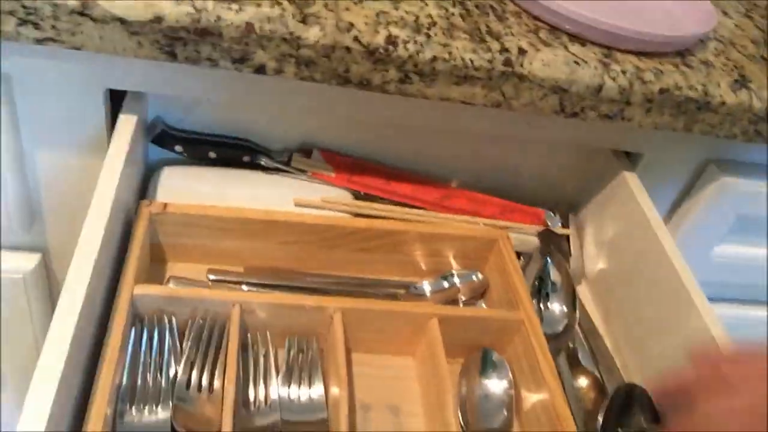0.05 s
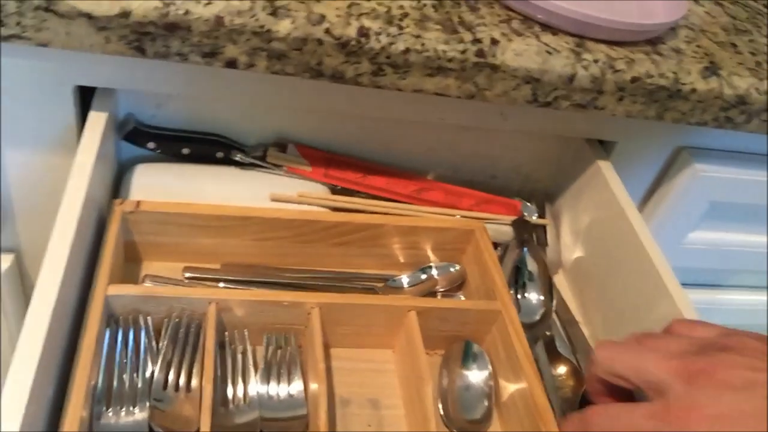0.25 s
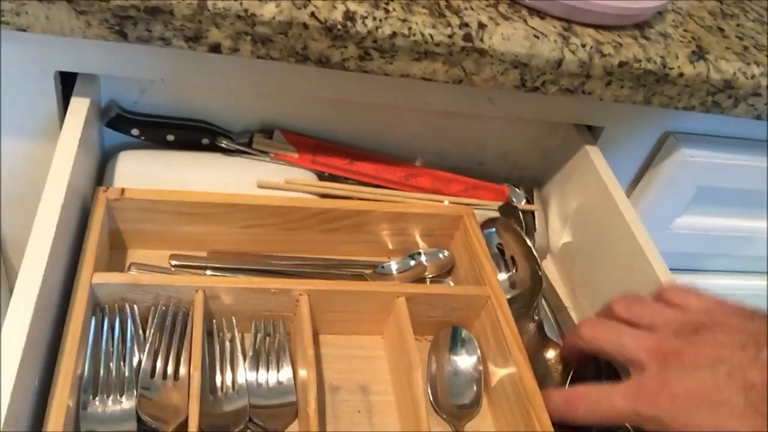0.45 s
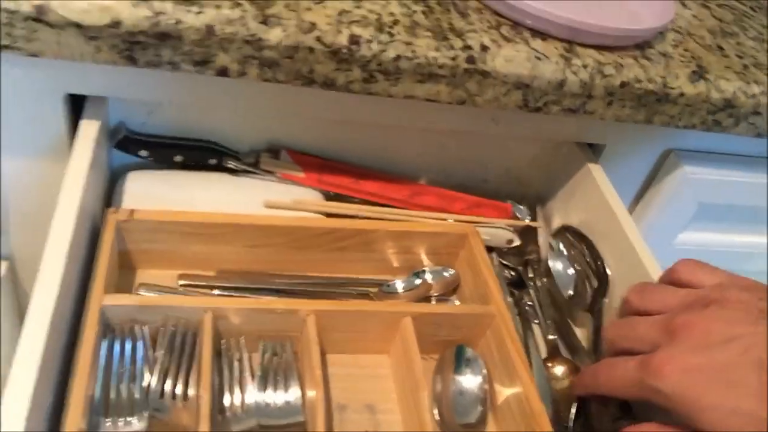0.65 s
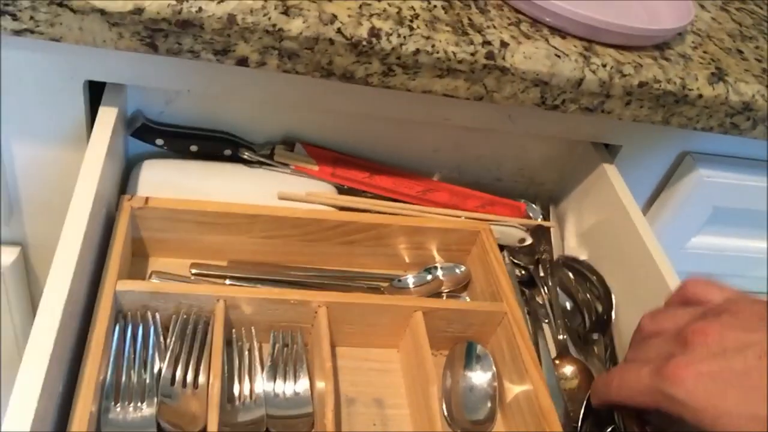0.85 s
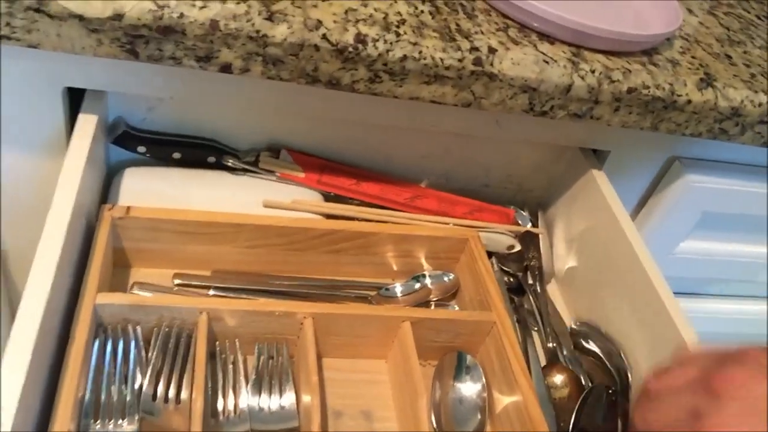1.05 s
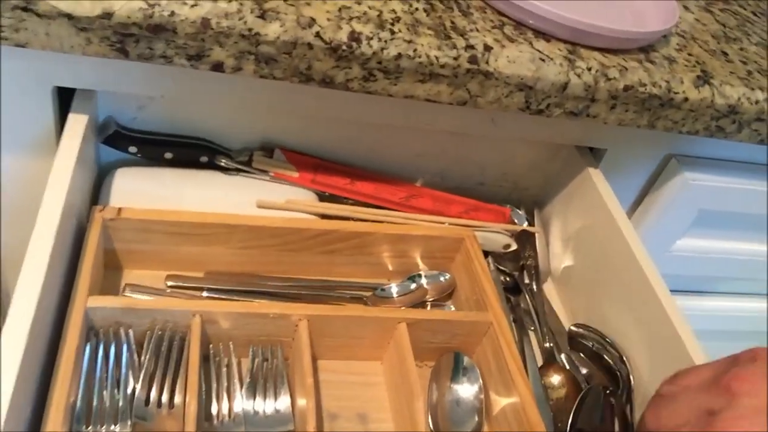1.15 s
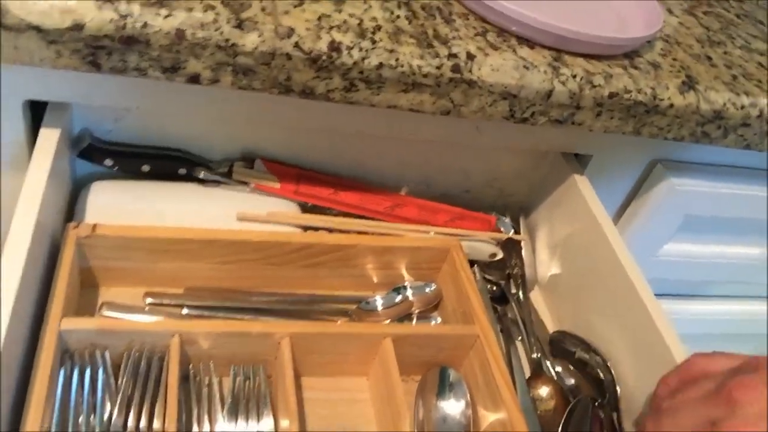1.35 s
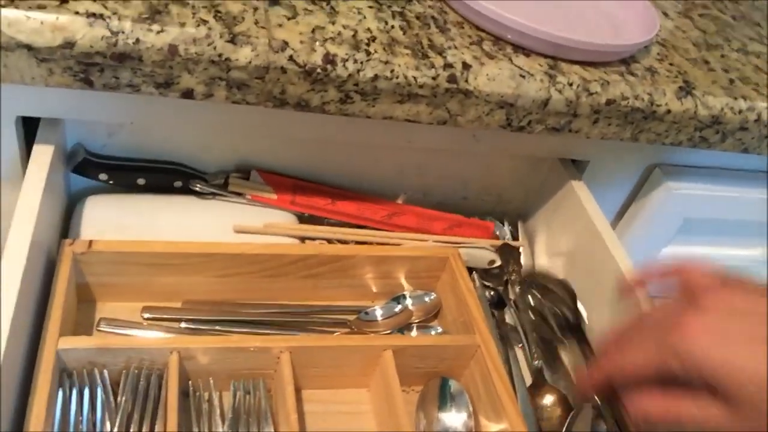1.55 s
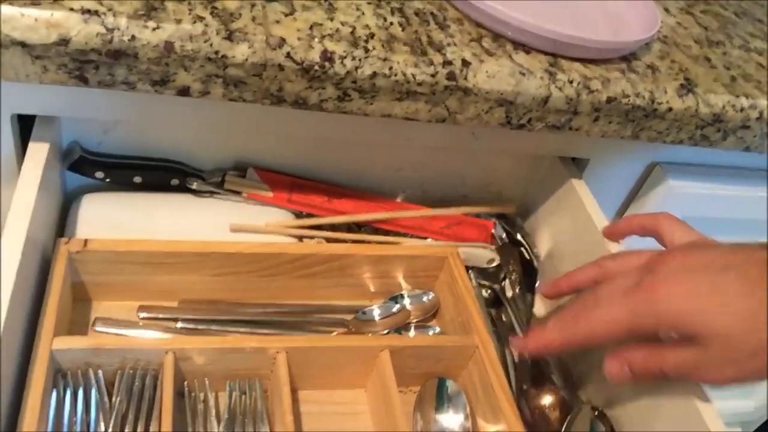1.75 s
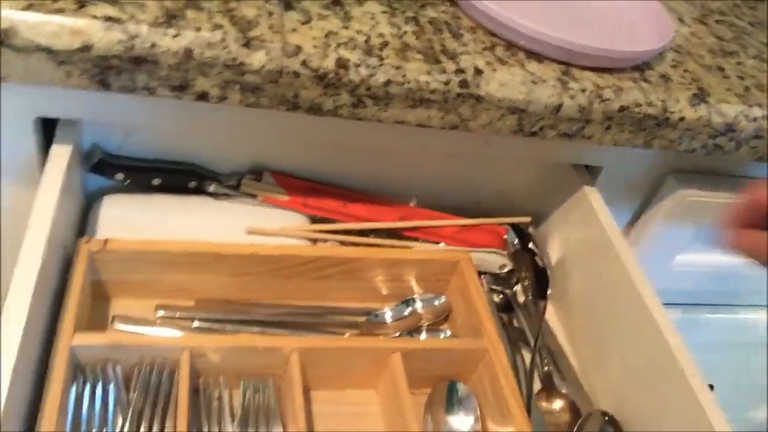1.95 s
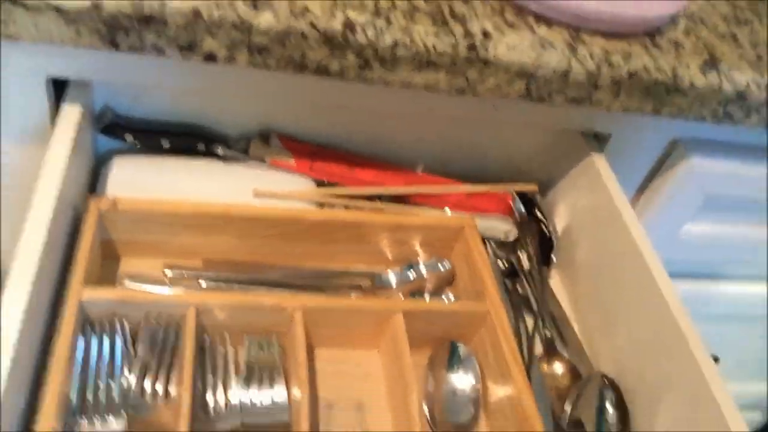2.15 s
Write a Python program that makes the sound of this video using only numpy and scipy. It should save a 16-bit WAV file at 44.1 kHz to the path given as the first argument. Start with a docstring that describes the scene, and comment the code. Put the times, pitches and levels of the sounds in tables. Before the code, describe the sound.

Metal spoons clatter and jingle as a hand rummages through a wooden kitchen drawer, close up

```python
"""In the side of an open wooden kitchen drawer, close to the microphone, a hand rummages through loose steel spoons.
Each contact excites the heap's crowded modes, the few modes of one piece and the resonances of the drawer.
Slides are trains of small contacts; a heavy ladle blow, singing scrapes and a freely ringing spoon stand out.
A small kitchen answers diffusely over a quiet background, and the hardest blow overloads the recorder."""
import sys
import numpy as np
from scipy import signal
from scipy.fft import rfft, irfft, next_fast_len
from scipy.io import wavfile

SR = 44100
rng = np.random.default_rng(int(sys.argv[2]) if len(sys.argv) > 2 else 0)


def write(x):
    x = np.atleast_2d(x).T
    wavfile.write(sys.argv[1], SR, np.round(np.clip(x, -1, 1) * 32767).astype(np.int16))


N = 97020  # length [samples]
T = np.arange(int(.4 * SR)) / SR  # time axis of one contact [s]
ATTACK_S = 0.00049  # time constant of every onset
TOP_HZ = 15750  # band limit


def amp(db):
    """Level: decibels to an amplitude ratio."""
    return 10 ** (np.asarray(db) / 20)


def unit(x):
    """Normalisation: equal mean power, rms 1 along the last axis."""
    return x / np.sqrt(np.mean(x ** 2, axis=-1, keepdims=True) + 1e-20)


def along(points, hz):
    """Logarithmic frequency scale: read (Hz, value) points between their frequencies."""
    f, v = np.transpose(points)
    return np.interp(np.log(hz + 1), np.log(f + 1), v)


def fade(t60, t=T):
    """Exponential decay: 60 dB are lost in each t60, one row per value."""
    exponent = -np.log(1000) * t / np.reshape(t60, (-1, 1))
    return np.exp(np.float32(np.maximum(exponent, -30)))


def onset():
    """Finite contact time: the amplitude approaches its full value exponentially."""
    return 1 - np.exp(-T / ATTACK_S)


def noise(colour, count, size):
    """Spectral shaping: rows of noise of rms 1 weighted by a colour curve."""
    gain = amp(along(colour, np.fft.rfftfreq(size, 1 / SR)))
    spectra = rfft(rng.standard_normal((count, size)))
    return unit(irfft(spectra * gain, size))


def modes(hz, gains, t60):
    """Modal superposition: damped sines, one row of gains per contact, scaled to a starting rms of 1."""
    waves = np.sin(np.float32(2 * np.pi * np.outer(hz, T))) * fade(t60)
    start_rms = np.sqrt(np.sum(gains ** 2, axis=1, keepdims=True) / 2)
    return np.float32(gains / start_rms) @ waves


RING_SCATTER_DB = 1.5


def struck(db, count):
    """Modal participation: the size and sign of each mode change with the spot struck."""
    z = rng.standard_normal((count, 2, len(db)))
    return amp(db + RING_SCATTER_DB * z[:, 0]) * np.sign(z[:, 1])


# Single contacts, with relative levels of their parts: (time [s], treble chink level [dB],
# midrange clack level [dB], drawer knock level [dB], t60 that damps the heap and the thud [s],
# ring level [dB], strongest ring frequency [Hz], piece)
CONTACTS = [ (0.000, -24.5, -20.5, -33, 0.15, -29.5, 6944, "teaspoon"),
            (0.034, -33, -26.5, -34, 0.047, -36, 1232, "teaspoon"),
            (0.104, -42, -37, -50, 0.023, -42, 1660, "teaspoon"),
            (0.159, -23.5, -25.5, -27.5, 0.12, -28.5, 7270, "teaspoon"),
            (0.189, -29, -27.5, -33, 0.14, -31, 1196, "teaspoon"),
            (0.218, -16, -18, -30, 0.037, -20.5, 7760, "teaspoon"),
            (0.274, -18, -22.5, -31, 0.086, -27, 6950, "teaspoon"),
            (0.302, -12, -12, -28, 0.078, -18, 2520, "teaspoon"),
            (0.316, -11, -10.5, -27, 0.072, -16, 1210, "teaspoon"),
            (0.336, -15.5, -25, -33.5, 0.15, -22, 7960, "teaspoon"),
            (0.385, -12, -12, -20.5, 0.035, -23, 5310, "teaspoon"),
            (0.440, -26.5, -27.5, -36, 0.1, -39, 8740, "teaspoon"),
            (0.468, -29, -28, -30, 0.077, -35.5, 1204, "teaspoon"),
            (0.586, -18, -20.5, -21, 0.14, -23.5, 11380, "teaspoon"),
            (0.614, -12, -12, -14, 0.095, -18.5, 11670, "teaspoon"),
            (0.628, -8.5, -18.5, -20, 0.13, -23, 1167, "teaspoon"),
            (0.677, -12.5, -9, -34, 0.027, -35, 2340, "ladle"),
            (0.684, -10, 0.5, -8.5, 0.029, -9.5, 2360, "ladle"),
            (0.689, -3.5, -20, -23, 0.055, -14.5, 7430, "ladle"),
            (0.711, -18, -20.5, -27.5, 0.19, -26, 840, "teaspoon"),
            (0.727, -16.5, -15.5, -23, 0.1, -30, 6966, "teaspoon"),
            (0.929, -13.5, -15, -23, 0.071, -23, 2080, "ladle"),
            (0.947, -31, -21, -28.5, 0.038, -23.5, 2000, "ladle"),
            (1.027, -42, -36, -47, 0.11, -39, 3832, "teaspoon"),
            (1.079, -24.5, -24, -30.5, 0.58, -42, 2100, "teaspoon"),
            (1.113, -16, -14, -25.5, 0.25, -26, 972, "teaspoon"),
            (1.126, -13, -14.5, -24, 0.11, -18, 985, "teaspoon"),
            (1.140, -27, -19, -22, 0.08, -19.5, 3900, "teaspoon"),
            (1.164, -18, -17, -24, 0.078, -30, 2004, "teaspoon"),
            (1.202, -16.5, -25.5, -35, 0.2, -21, 12200, "teaspoon"),
            (1.238, -39, -37, -55, 0.11, -28, 3700, "teaspoon"),
            (1.297, -26, -26.5, -30, 0.036, -31.5, 1154, "teaspoon"),
            (1.347, -23.5, -36, -66, 0.078, -39.5, 7020, "teaspoon"),
            (1.356, -34, -26.5, -40.5, 0.11, -35.5, 2000, "ladle"),
            (1.555, -37.5, -36, -38, 0.075, -44, 4330, "spoon"),
            (1.596, -17, -13, -15, 0.052, -19.5, 1290, "spoon"),
            (1.610, -28, -28.5, -33.5, 0.04, -33, 1235, "spoon"),
            (1.630, -14, -32, -40, 0.035, -13.5, 5960, "spoon"),
            (1.632, -10.5, -18, -24, 0.07, -13.5, 12410, "spoon"),
            (1.653, -16.5, -15.5, -22, 0.11, -22.5, 1813, "spoon"),
            (1.679, -19.5, -17, -40, 0.06, -27, 2716, "spoon"),
            (1.688, -22, -48, -23.5, 0.05, -32, 1266, "spoon"),
            (1.702, -15.5, -18.5, -38, 0.062, -21, 1178, "spoon"),
            (1.710, -24, -18.5, -28, 0.057, -30, 1260, "spoon"),
            (1.752, -16.5, -33, -47, 0.042, -24.5, 6130, "spoon"),
            (1.756, -22.5, -17.5, -27, 0.038, -23, 11770, "spoon"),
            (1.815, -19, -22, -26.5, 0.13, -24, 11627, "spoon"),
            (1.830, -33, -16.5, -33, 0.13, -22.5, 1413, "spoon"),
            (1.841, -18, -35, -30.5, 0.18, -37, 11640, "spoon"),
            (1.874, -9.5, -10, -23.5, 0.055, -14.5, 9570, "spoon"),
            (1.894, -16.5, -15, -30, 0.054, -18, 9528, "spoon"),
            (1.917, -19, -21.5, -27, 0.067, -30.5, 3703, "spoon"), ]
# Pieces sliding over each other, with relative levels for each small contact: (start time [s],
# end time [s], chink level [dB], clack level [dB], knock level [dB], ring level [dB], piece)
SLIDING = [ (0.196, 0.248, -26, -27.5, -31.5, -31, "teaspoon"),
           (0.492, 0.580, -53, -43, -48, -72, "teaspoon"), (0.593, 0.662, -15, -17, -27.5, -27, "teaspoon"),
           (0.739, 0.925, -48, -35, -45, -49.5, "teaspoon"),
           (0.956, 1.110, -42.5, -35.5, -43, -42.5, "ladle"),
           (1.126, 1.178, -16.5, -23, -37, -31, "teaspoon"),
           (1.178, 1.245, -25, -28.5, -41, -36, "teaspoon"),
           (1.301, 1.388, -36.5, -35.5, -48, -53, "teaspoon"),
           (1.501, 1.556, -54, -41.5, -51, -52, "spoon"), (1.601, 1.707, -30, -24.5, -34, -52.5, "spoon"),
           (1.770, 1.870, -35, -33, -50, -56, "spoon"), ]
SLIDE_PER_S, SLIDE_T60_S, SLIDE_SCATTER_DB = 100, 0.093, 1.5
SLIDE_RING_HZ, SLIDE_RING_OCTAVES = 4740, 0.57  # centre and spread of the strongest ring


def contacts():
    """Sliding as repeated impact: the single hits, then a train of small contacts for each slide."""
    rows = list(CONTACTS)
    for start, end, chink, clack, knock, ring, piece in SLIDING:
        for s in np.arange(start, end, 1 / SLIDE_PER_S):
            d = SLIDE_SCATTER_DB * rng.standard_normal()
            lead_hz = SLIDE_RING_HZ * 2 ** (SLIDE_RING_OCTAVES * rng.standard_normal())
            lead_hz = min(lead_hz, TOP_HZ)
            time = s + rng.random() / SLIDE_PER_S
            rows.append((time, chink + d, clack + d, knock + d, SLIDE_T60_S, ring + d, lead_hz, piece))
    return rows


COLOUR_DB, COLOUR_STEP_HZ = 4.5, 323.8  # each contact favours its own regions of the spectrum
PILE_T60_S = 1  # decay of the modes before the contact's own damping is multiplied in
CRACK_DB, CRACK_T60_S = 2, 0.05  # crack relative to the modes


def pile(colour, t60, lo_hz, hi_hz, count):
    """High modal density: a crack and the heap's crowded modes, coloured anew and damped by other pieces."""
    hz = lo_hz + (hi_hz - lo_hz) * (np.arange(count) + rng.random(count)) / count
    knots = rng.standard_normal((len(t60), 128))
    bumps = np.array([np.interp(hz / COLOUR_STEP_HZ, np.arange(len(k)), k) for k in knots])
    gains = amp(along(colour, hz) + COLOUR_DB * bumps) * rng.standard_normal((len(t60), count))
    heap = modes(hz, gains, PILE_T60_S) * fade(t60)
    crack = amp(CRACK_DB) * noise(colour, len(t60), len(T)) * fade(CRACK_T60_S)
    return (heap + crack) / np.sqrt(2)


# Modes of the single steel pieces, by piece: (frequency [Hz], relative level [dB])
PIECE_MODES = { "teaspoon": [(1227, 1), (2444, -1), (4269, 0), (6780, -10.5), (6966, 3.5), (7740, -1),
               (8371, -17.5), (11886, 0.5), (12209, -1), (13087, -9), (14174, -0.5), (15493, -3)],
               "ladle": [(1245, -5), (1605, -5), (2012, 10), (2272, 2), (3130, 5), (6966, -1), (7423, -1),
               (8790, 0.5), (9880, 1.5), (11012, -9)], "spoon": [(1190, -8), (1262, -1), (2320, -9),
               (3682, -3), (5075, -7.5), (5954, -15), (7553, -1.5), (7858, 3), (8769, -1.5), (9528, -6),
               (11030, -2), (11630, 1), (12420, -7)], }
# Central decay time of each piece's modes, by piece: t60 [s]
PIECE_T60_S = {"teaspoon": 0.13, "ladle": 0.097, "spoon": 0.12}
RING_DB = -0.5  # all modes of the piece
LEAD_DB, LEAD_T60_S = 3.5, 0.081  # the mode excited most, and its longest decay
DETUNE, DAMPING_SPREAD = 0.00412, 0.076  # grip of the neighbours: spread of pitch (ratio) and log decay
TEASPOON_SPREAD = 0.03  # no two teaspoons have quite the same pitch (ratio)


def rings(pieces, lead_hz, clatter_t60):
    """Sparse modes: the struck piece rings above the heap, led by one mode and altered by how it is held."""
    out = []
    for name, lead, t60 in zip(pieces, lead_hz, clatter_t60):
        hz, db = np.transpose(PIECE_MODES[name])
        shift, damping = rng.standard_normal((2, len(hz)))
        own_pitch = 1 + TEASPOON_SPREAD * rng.standard_normal() * (name == "teaspoon")
        held_hz = hz * own_pitch * (1 + DETUNE * shift)
        held_t60 = PIECE_T60_S[name] * np.exp(DAMPING_SPREAD * damping)
        body = modes(held_hz, struck(db, 1), held_t60)
        strongest = modes([lead], np.ones((1, 1)), min(LEAD_T60_S, t60))
        out.append(amp(RING_DB) * body + amp(LEAD_DB) * strongest)
    return np.vstack(out)


# Resonances of the wooden drawer: (frequency [Hz], relative level [dB], t60 [s])
WOOD = [(172, -3, 0.151), (213.3, -2, 0.1), (296.3, -3.5, 0.13), (351.7, 3, 0.13), (424.2, 0, 0.086),
        (521.5, 6, 0.076), (576.6, 0, 0.072)]
# Colour of the dull thud: (frequency [Hz], relative level per Hz [dB])
THUD_COLOUR = [(25, -39), (60, -20), (115, -17), (165, -0.5), (250, 2.5), (350, 2), (500, -2.5),
               (650, -5.5), (1100, -5), (3000, -37.5)]
DRAWER_DB, THUD_DB = -5, -4.5  # resonances and thud within a knock


def drawer(t60):
    """Forced panel vibration: a dull thud and the resonances of the drawer's bottom."""
    hz, db, wood_t60 = np.transpose(WOOD)
    wood = modes(hz, struck(db, len(t60)), wood_t60)
    thud = noise(THUD_COLOUR, len(t60), len(T)) * fade(t60)
    return amp(DRAWER_DB) * wood + amp(THUD_DB) * thud


WALLS_S, WALLS_DB = .012, -3  # longest delay; summed level of the reflections relative to the direct sound


def walls(sound, count=8):
    """Early reflection: quick echoes from drawer sides and counter, different for each spot in the heap."""
    out = sound.copy()
    gain = amp(WALLS_DB) / np.sqrt(count)
    delays = rng.uniform(.1, 1, count) * WALLS_S
    for delay, sign in zip(delays, rng.choice([-1, 1], count)):
        out += sign * gain * np.pad(sound, (int(delay * SR), 0))[:len(sound)]
    return unit(out) * np.std(sound)  # the overall level stays that of the contact


# Colour of the treble chink: (frequency [Hz], relative level per Hz [dB])
CHINK_COLOUR = [(2000, -16.5), (3500, 0.5), (4500, -2), (6000, -1), (8000, -2), (10300, -4), (12000, -2.5),
                (14000, -5), (15700, -10.5)]
# Colour of the midrange clack: (frequency [Hz], relative level per Hz [dB])
CLACK_COLOUR = [(400, -12.5), (720, -6), (1000, -3.5), (1250, 3), (1600, -2), (2200, 1), (3000, -4.5),
                (4000, -6), (6000, -30)]


def cutlery():
    """Impact excitation: every contact chinks, clacks, rings a piece and knocks the drawer."""
    times, chink, clack, knock, t60, ring, lead_hz, pieces = map(np.array, zip(*contacts()))
    sounds = amp(chink)[:, None] * pile(CHINK_COLOUR, t60, lo_hz=2946, hi_hz=15880, count=100)
    sounds = sounds + amp(clack)[:, None] * pile(CLACK_COLOUR, t60, lo_hz=598.3, hi_hz=5003, count=60)
    sounds = sounds + amp(knock)[:, None] * drawer(t60)
    sounds = sounds + amp(ring)[:, None] * rings(pieces, lead_hz, t60)
    out = np.zeros(N + SR)
    for s, sound in zip(times, sounds * onset()):
        out[max(0, round(s * SR)):][:len(T)] += walls(sound)
    return out[:N]


# Decay of the kitchen; a negative time makes the lowest band swell: (frequency [Hz], t60 [s])
KITCHEN_T60 = [(100, -0.2), (400, 0.42), (900, 0.46), (2000, 0.38), (5000, 0.56), (13000, 0.2)]
# Strength of the kitchen's answer: (frequency [Hz], relative level [dB])
KITCHEN_LEVEL = [(100, -20.5), (700, -6), (2000, -13), (5000, -13.5), (13000, -11)]


def kitchen(x, build_s=0.011):
    """Diffuse reverberation: convolution with noise that builds up quickly and decays band by band."""
    hz, t, z = signal.stft(rng.standard_normal(SR * 2 // 3), SR, nperseg=256)
    shape = fade(along(KITCHEN_T60, hz), t) * (1 - np.exp(-t / build_s))
    bands = z * unit(shape) * amp(along(KITCHEN_LEVEL, hz))[:, None]
    tail = signal.istft(bands, SR, nperseg=256)[1]
    return signal.fftconvolve(x, tail / np.sqrt(len(tail)))[:N]


# Colour of the background: (frequency [Hz], relative level per Hz [dB])
FLOOR_COLOUR = [(25, -30), (100, -7.5), (210, 0), (300, -3), (430, -28.5), (900, -12.5), (1500, -19),
                (5000, -20), (15000, -37)]
FLOOR_DB = -51  # rms level


def background():
    """Stationary noise: a quiet coloured floor of constant mean power."""
    return amp(FLOOR_DB) * noise(FLOOR_COLOUR, 1, N)


# What rings under the ladle's weight: (frequency [Hz], relative level [dB], t60 [s])
BLOW_MODES = [(176, -6.5, 0.1), (355, -23, 0.036), (431.5, -7.5, 0.05), (587, -7, 0.06), (765, -7, 0.046),
              (1210, -6, 0.065), (1600, 1, 0.055), (2010, -6.5, 0.033), (2273, -2.5, 0.057)]
BANG_S, BANG_DB = 0.6842, -1.5  # time and starting rms level before the onset


def bang():
    """Heavily damped modes: the ladle drives the heap into the drawer's bottom, a thump under a choked clank."""
    hz, db, t60 = np.transpose(BLOW_MODES)
    signs = rng.choice([-1, 1], (1, len(hz)))
    sound = modes(hz, amp(db) * signs, t60)[0] * onset()
    out = np.zeros(N + SR)
    out[round(BANG_S * SR):][:len(T)] = amp(BANG_DB) * sound
    return out[:N]


# Edges that sing along a neighbour: (start time [s], end time [s], first frequency [Hz],
# last frequency [Hz], level [dB])
SINGING_EDGES = [ (1.176, 1.236, 6760, 7040, -28), (1.222, 1.268, 5180, 5280, -43),
                 (1.218, 1.262, 5170, 5260, -33), (1.232, 1.276, 4040, 4490, -35), ]
SCRAPE_WIDTH_HZ, SCRAPE_EDGE_S = 95, 0.0063  # bandwidth of the roughness; fade at either end


def scrapes():
    """Friction excitation: one rough ring, whose pitch shifts as the point of contact moves."""
    t, out = np.arange(N) / SR, np.zeros(N)
    for start, end, first_hz, last_hz, db in SINGING_EDGES:
        hz = np.interp(t, [start, end], [first_hz, last_hz])
        phase = 2 * np.pi * np.cumsum(hz) / SR
        slow_noise = rng.standard_normal((2, int(SCRAPE_WIDTH_HZ * N / SR)))
        grip = signal.resample(slow_noise, N, axis=1)
        stroke = np.clip(np.minimum(t - start, end - t) / SCRAPE_EDGE_S, 0, 1)
        ring = stroke * (grip[0] * np.cos(phase) + grip[1] * np.sin(phase))
        to_unit = np.sqrt(np.sum(stroke ** 2) / (np.sum(ring ** 2) + 1e-20))
        out += amp(db) * ring * to_unit
    return out


# Moments when the large spoon swings free: (time [s], level [dB])
FREE_SWINGS = [(1.631, -42), (1.873, -29), (2.080, -47.5)]
# Its freely ringing modes: (frequency [Hz], relative level [dB])
FREE_SPOON_MODES = [(3682, -8), (7553, 5.5), (7858, -13), (8769, -2), (9528, 0), (11030, -8)]
FREE_T60_S = 0.35


def afterring():
    """Light damping: the few modes of the large spoon that its neighbours hardly damp keep ringing."""
    hz, db = np.transpose(FREE_SPOON_MODES)
    out = np.zeros(N + SR)
    for s, level in FREE_SWINGS:
        sound = modes(hz, struck(db, 1), FREE_T60_S)[0] * onset()
        out[round(s * SR):][:len(T)] += amp(level) * sound
    return out[:N]


def scene():
    """Superposition: cutlery with little deep bass, the room's answer and background."""
    low_cut = signal.butter(2, 64, "highpass", fs=SR, output="sos")  # corner in Hz
    direct = signal.sosfilt(low_cut, cutlery() + bang() + scrapes() + afterring())
    return direct + kitchen(direct) + background()


CLIP_TOP = .93  # amplitude that the rounded peaks approach


def record(dry):
    """Saturation and band limiting: the recorder rounds off the highest peaks, then cuts above its top."""
    clipped = dry / (1 + np.abs(dry / CLIP_TOP) ** 6) ** (1 / 6)
    m = next_fast_len(N + SR // 2)
    hz = np.fft.rfftfreq(m, 1 / SR)
    band = np.clip((TOP_HZ - hz) / 200 + .5, 0, 1)  # slope 200 Hz wide
    return irfft(rfft(clipped, m) * band, m)[:, :N]


dry = scene()
out = record(dry)
write(out)
```